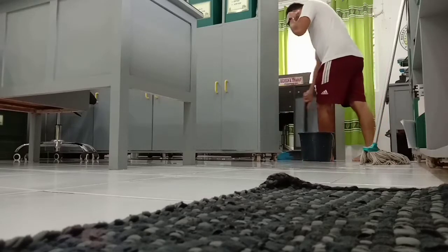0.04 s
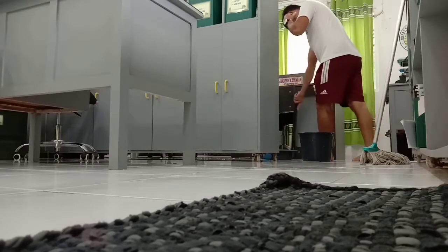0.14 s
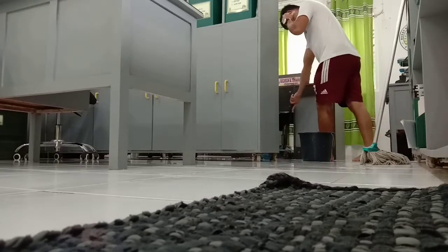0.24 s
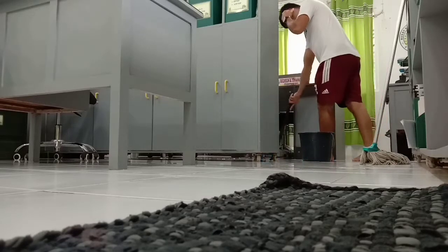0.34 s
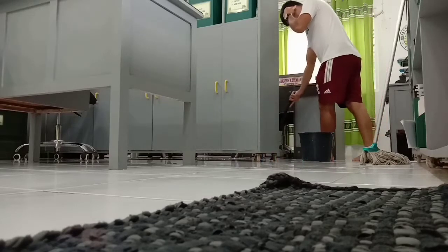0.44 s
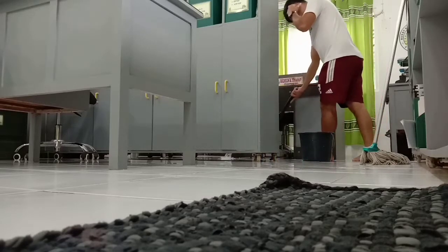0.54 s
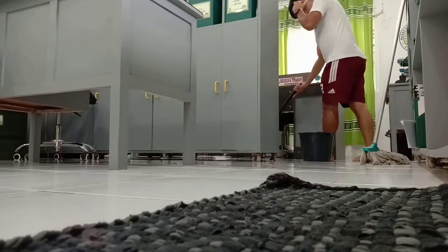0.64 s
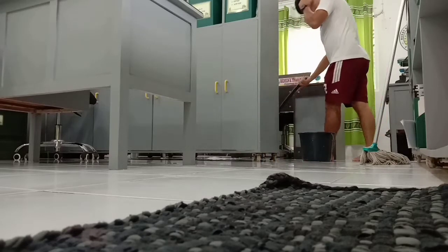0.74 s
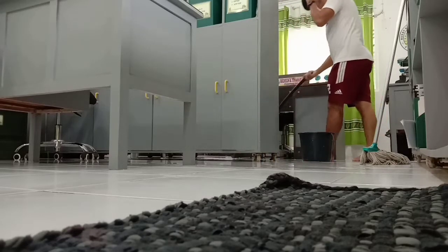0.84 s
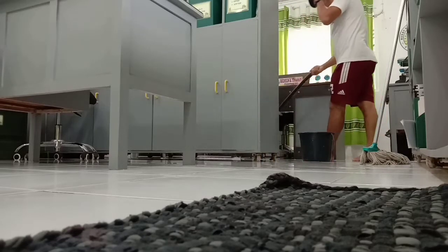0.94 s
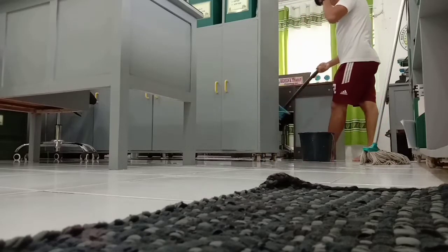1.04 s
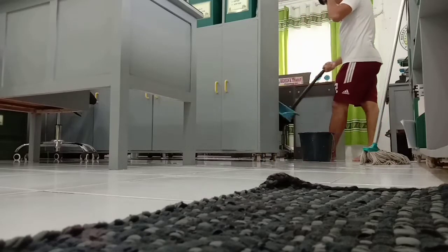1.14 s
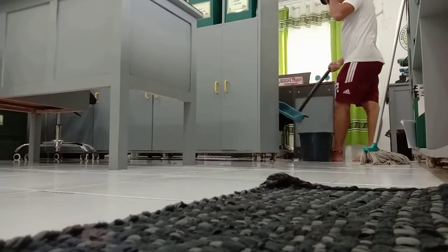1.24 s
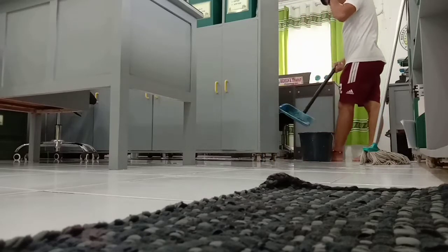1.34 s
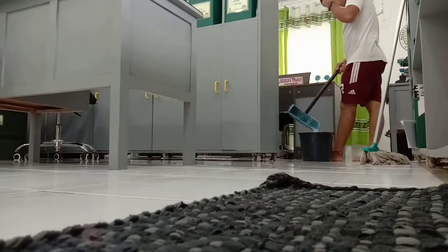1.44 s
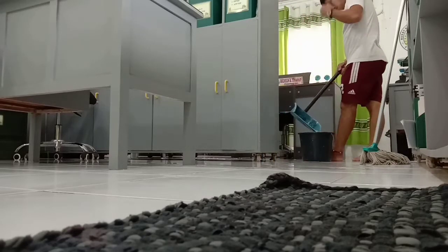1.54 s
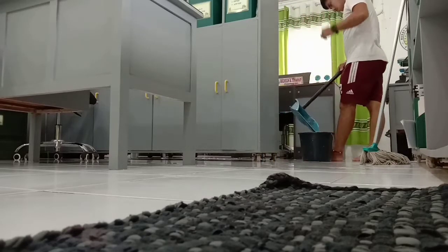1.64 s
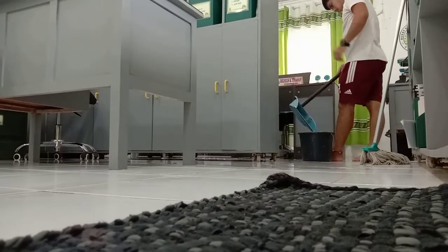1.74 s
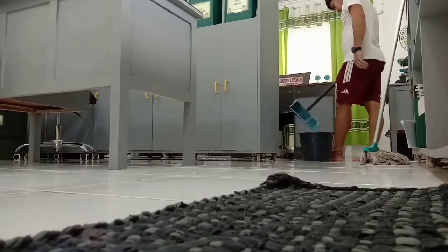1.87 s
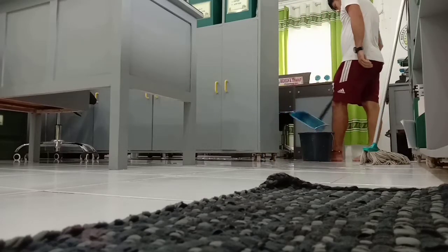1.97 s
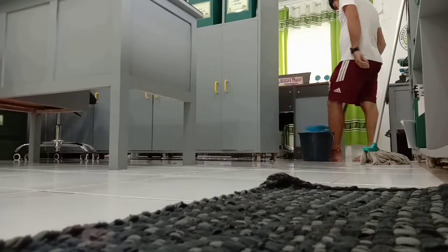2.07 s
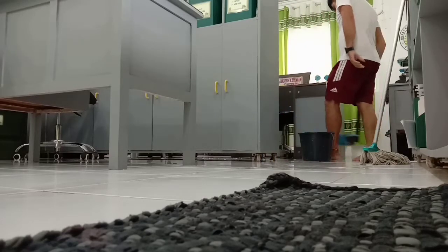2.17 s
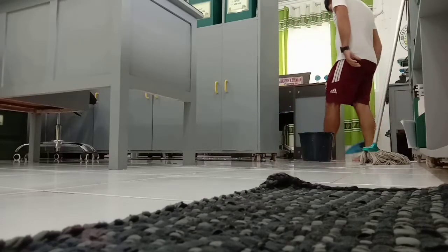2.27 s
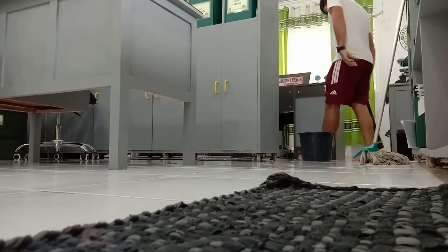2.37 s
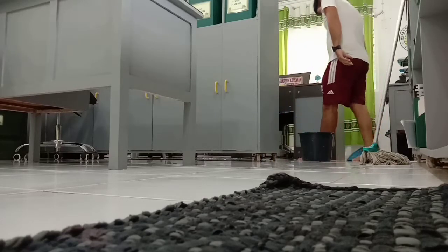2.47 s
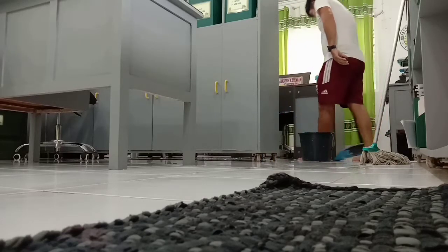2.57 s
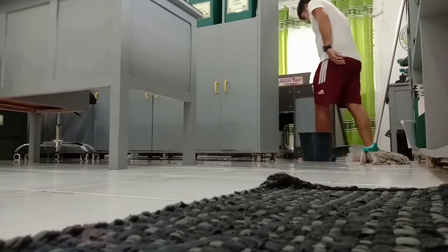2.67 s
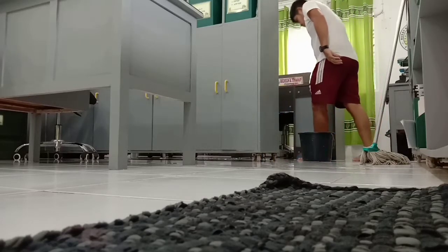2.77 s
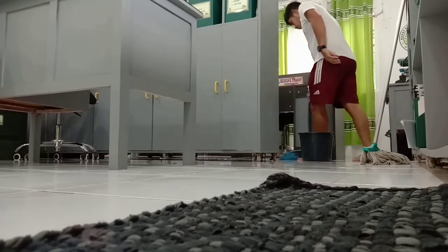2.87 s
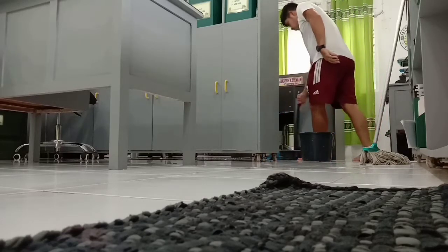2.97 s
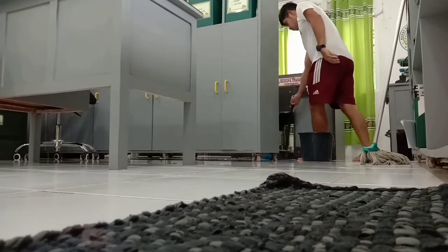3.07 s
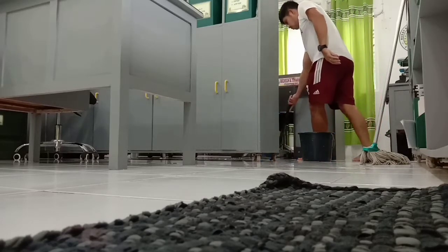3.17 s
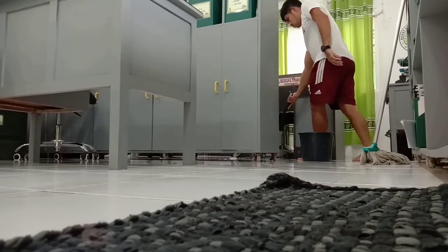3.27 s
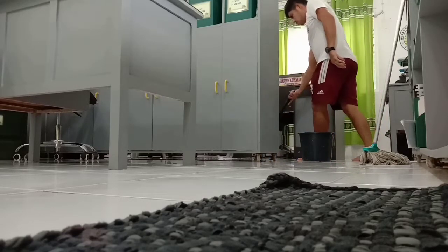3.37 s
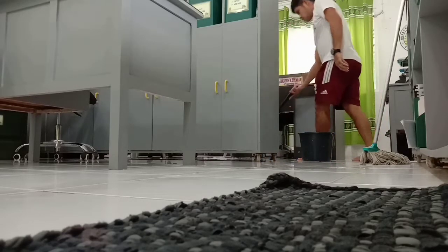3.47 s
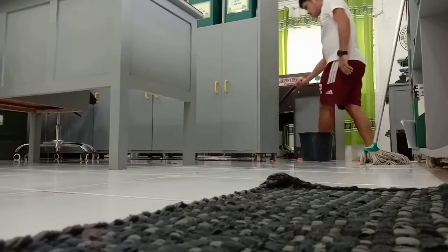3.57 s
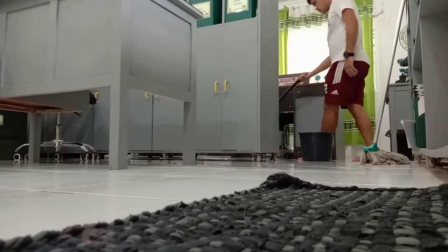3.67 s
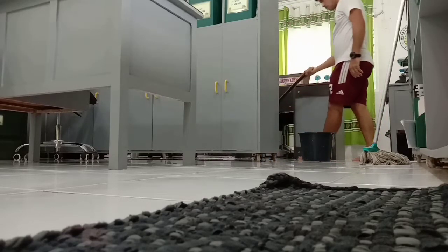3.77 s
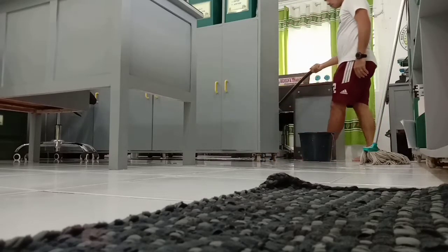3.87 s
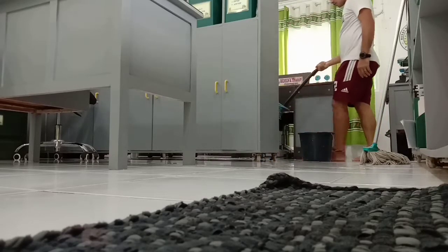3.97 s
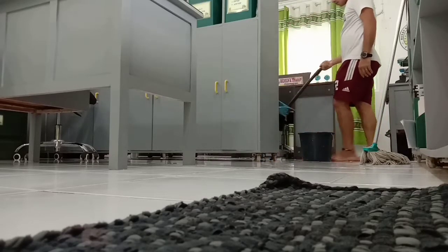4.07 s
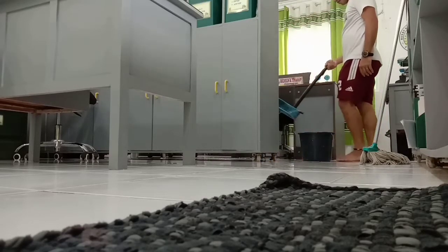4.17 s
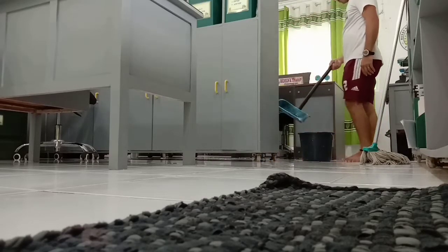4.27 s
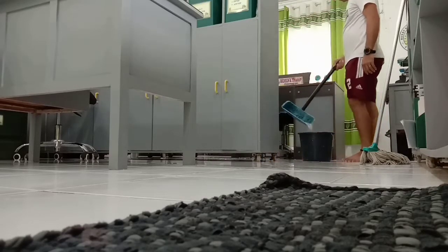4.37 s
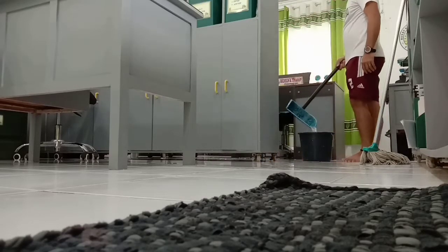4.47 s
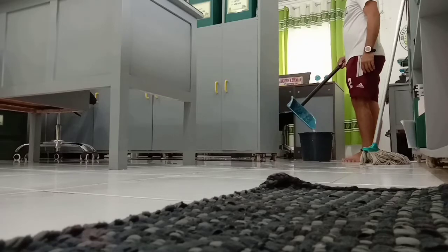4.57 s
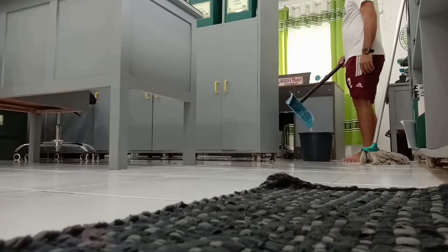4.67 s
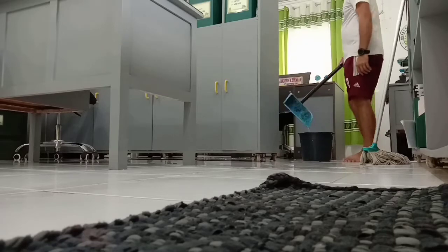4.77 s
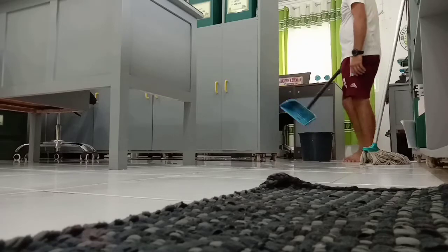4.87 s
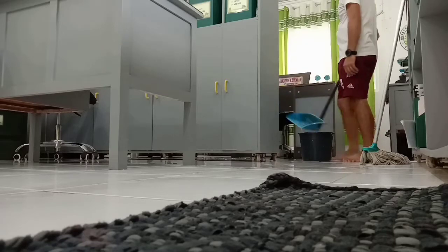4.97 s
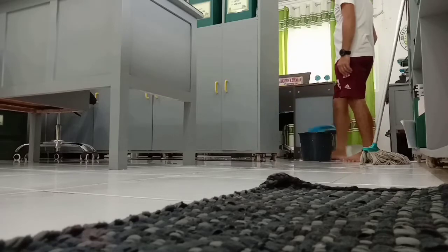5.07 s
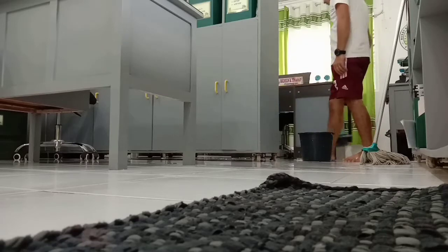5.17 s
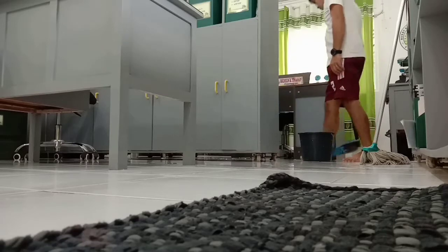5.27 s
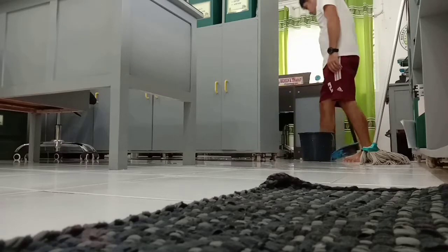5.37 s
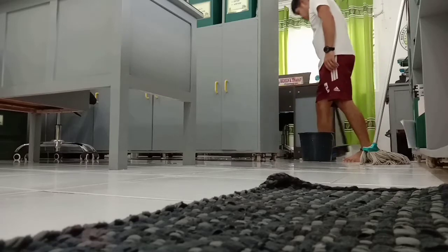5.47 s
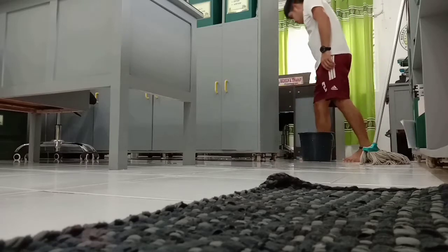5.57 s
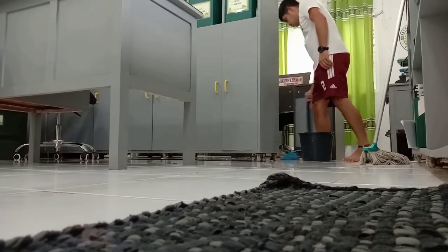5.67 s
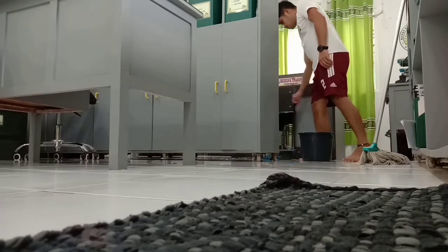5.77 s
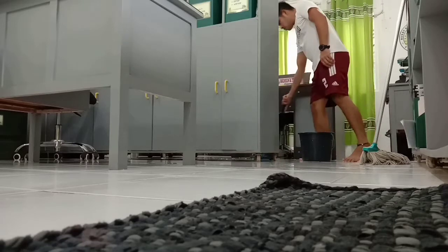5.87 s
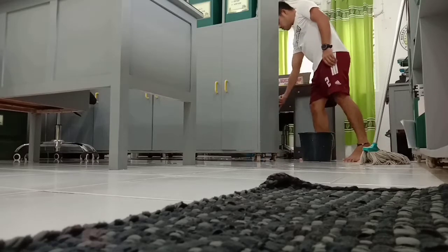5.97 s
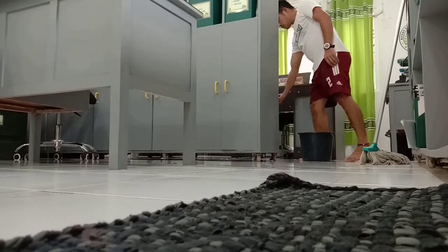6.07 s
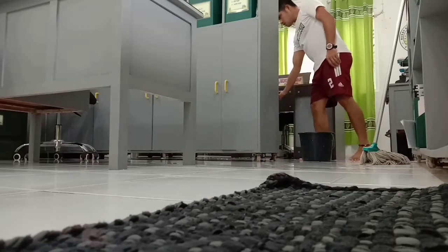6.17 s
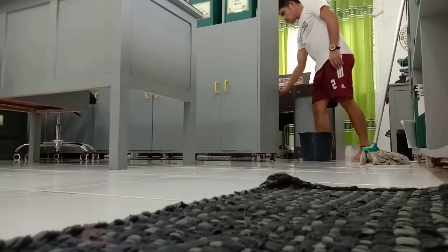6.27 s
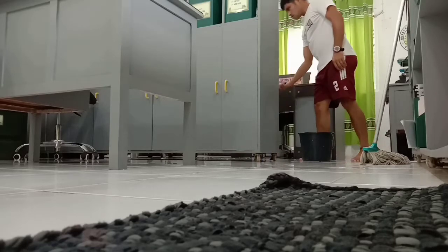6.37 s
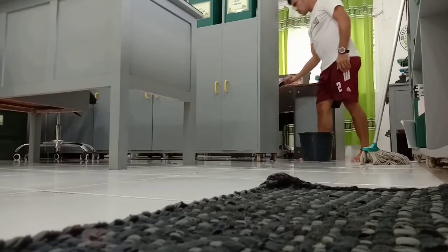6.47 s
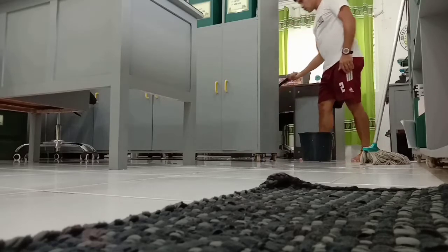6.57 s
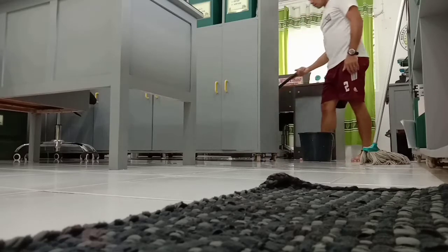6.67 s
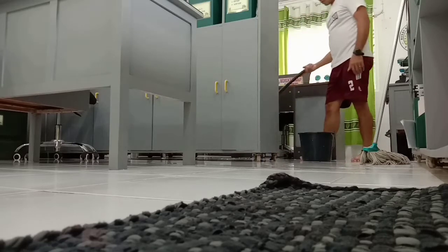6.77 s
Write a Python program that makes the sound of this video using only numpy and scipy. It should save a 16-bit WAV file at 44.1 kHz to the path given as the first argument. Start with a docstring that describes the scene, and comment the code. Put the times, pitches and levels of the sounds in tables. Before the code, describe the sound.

A plastic dustpan knocks and scrapes on a wet tile floor, then water dribbles and is tipped into a bucket, twice, indoors.

```python
"""A plastic dustpan clatters onto a wet tile floor and scrapes through the water. Blows ring its tray,
walls and edge; its lip sticks and slips. Lifted, it dribbles and is tipped into a bucket: showers of
small bubbles, single drops, a few glugs. This happens twice, and a third scoop begins. All is heard from
a few metres off, mostly through the ring of a small hard room, over steady air noise and a faint hum."""
import sys
import numpy as np
from scipy import signal
from scipy.fft import rfft, irfft
from scipy.io import wavfile

SR = 44100
rng = np.random.default_rng(int(sys.argv[2]) if len(sys.argv) > 2 else 0)


def log_audio(samples):
    """Write samples as a 16-bit WAV file to the path given in sys.argv[1]."""
    # one column per channel
    frames = np.atleast_2d(samples).T
    # limit to full scale, then quantise
    limited = np.clip(frames, -1, 1)
    pcm = np.round(limited * 32767).astype(np.int16)
    wavfile.write(sys.argv[1], SR, pcm)


N = 300762
T = np.arange(N) / SR

# pan modes, flexing tray to stiff front edge: f/Hz, width/Hz, level/dB
TRAY_MODES = [(229, 43, -9), (317, 24.7, -3.5), (391, 33.5, -2.5), (515, 67, -6.5)]
WALL_MODES = [(613, 66, -6.5), (732, 98, -0.5), (886, 233, 0), (1039, 150, -1.5)]
EDGE_MODES = [(1108, 58, 0.58), (1264, 186, -4.1)]
# wet crack spectrum: f/Hz, level/dB
CRACK_EQ = [(150, -41), (500, -63), (1400, 4.5), (2000, 4), (2700, 3), (3500, -2.5), (5500, -3),
            (8000, -5.5), (11000, -12), (15000, -26)]
# pan knocks, except the row at 0.41 s: a faint, brief swell of the background ring near 1250 Hz
# t/s, level/dB, tray/dB, edge/dB, crack/dB (these three re walls), contact/s
RING_EVENTS = [(0.001, -34.5, -7.5, 0, -0.5, 0.0045), (0.020, -32, -5.5, -16, -3, 0.017),
               (0.068, -33, -6, -2.5, -14, 0.0076), (0.154, -35.5, -7, -8, -4.5, 0.0037),
               (0.181, -38, -25, -5.5, -10, 0.0035), (.41, -60, -17, 7.5, -9, .006),
               (2.401, -27, -4, -14, -5.5, 0.0063), (2.422, -29.5, -2.5, -8, -5.5, 0.008),
               (2.626, -22, -3.5, -10.5, -6.5, 0.017), (2.656, -26.5, -7, -5, -10, 0.016),
               (2.803, -34.5, -7.5, 1.5, -8, 0.0091), (2.871, -27.5, -8.5, 1, -6.5, 0.0059),
               (2.908, -26, -9.5, -14, -8.5, 0.006), (3.012, -25.5, -11, -14, -7.5, 0.0088),
               (3.046, -30.5, -9, -5.5, -12, 0.0084), (3.114, -41, -10, -9, -9, 0.0036),
               (5.384, -25.5, -4, -12, -8, 0.0109), (5.643, -46, -10, 13, 8, 0.0077),
               (5.690, -21.5, -14, 3.5, -0.5, 0.0013), (5.709, -28, -6.5, 5.5, -4, 0.0083),
               (5.73, -24, -35, -2, -9, 0.0071), (5.799, -37, -17, 5, -12, 0.0036)]
def knocks(size=24000, cushion=0.1):
    """A blow is a chatter of contacts that rings tray, walls and edge, with a wet crack on top."""
    out, t = np.zeros(N), T[:size]
    bass_cut = signal.butter(4, 250, "high", fs=SR, output="sos")  # a small pan radiates little bass
    for s, db, tray_db, edge_db, crack_db, contact_s in RING_EVENTS:
        contact_s = max(contact_s, 0.003)
        touch_s = cushion * contact_s  # the water film softens the first touch
        chatter = rng.standard_normal(size) * np.exp(-t / contact_s) * (1 - np.exp(-t / touch_s))
        drive = signal.sosfilt(bass_cut, through(chatter, room(HIDDEN_DB)))
        parts = [(ring(drive, TRAY_MODES), tray_db), (ring(drive, WALL_MODES), 0),
                 (ring(drive, EDGE_MODES), edge_db), (colour(drive, CRACK_EQ), crack_db)]
        add(out, s - touch_s, sum(undb(db + part_db) * unit(part, size=2600) for part, part_db in parts))
    return out


# thud modes: f/Hz, width/Hz, level/dB
THUD_MODES = [(76, 23, -10), (110, 24, -6.5), (196, 30, -7)]
# dull thumps into the floor, each with its own low cut: t/s, level/dB, low cut/Hz
FLOOR_THUMPS = [(0.151, -53, 70), (2.408, -47, 100), (2.63, -36.5, 70.4), (2.682, -46, 70),
                (2.899, -44, 80), (5.723, -45, 280)]
def thumps(fade_s=0.0031, size=16000):
    """The weight of a full stroke thumps dully into the floor."""
    out = np.zeros(N)
    for s, db, low_cut_hz in FLOOR_THUMPS:
        push = through(rng.standard_normal(size) * np.exp(-T[:size] / fade_s), room(HIDDEN_DB))
        push = signal.sosfilt(signal.butter(2, low_cut_hz, "high", fs=SR, output="sos"), push)
        add(out, s, undb(db) * unit(ring(push, THUD_MODES), size=3000))
    return out


# strokes over wet tile: t/s, length/s, level/dB, slope/(dB/s)
LIP_STROKES = [(0, 0.15, -37, 37), (.14, 0.17, -36.5, -50), (2.455, 0.2, -36.5, 11),
               (2.592, 0.5, -25.5, -11.5), (5.388, 0.273, -32.5, 17), (5.719, 0.21, -27.5, -67)]
def pressure(attack_s=0.0077, release_s=0.018):
    """In each stroke the lip bites, is leaned on more or less, and lets go."""
    total = 0
    for s, length_s, db, db_per_s in LIP_STROKES:
        age = T - s
        bite = np.clip(age / attack_s, 0, 1)
        release = np.exp(-np.maximum(age - length_s, 0) / release_s)
        total = total + bite * release * undb(db + db_per_s * np.clip(age, 0, length_s))
    return total


# friction spectrum: f/Hz, level/dB
GRIT_EQ = [(80, -24), (200, -42), (380, -8), (500, -23.5), (720, 6.5), (1200, 1.5), (2200, 3), (3500, -3),
           (6000, -5.5), (9000, -11.5), (15000, -30)]
def scrape(slips_per_s=1500, rough_db=6, rub_db=-4, edge_db=-7.5, tray_db=-12):
    """The lip sticks and slips over the tile in dense uneven ticks that ring edge and tray."""
    slipping = rng.random(N) < slips_per_s / SR
    slips = slipping * rng.standard_normal(N) * undb(rough_db * rng.standard_normal(N))
    grit = unit(colour(slips, GRIT_EQ))
    edge = undb(edge_db) * unit(ring(slips, EDGE_MODES))
    tray = undb(tray_db) * unit(ring(slips, TRAY_MODES))
    return (grit + edge + tray) * pressure() * undb(rub_db)


# water slopping onto the tiles: peak t/s, half length/s, spatter/dB, spray/dB
TILE_SPILLS = [(0.598, 0.031, -41, -44), (.75, 0.089, -40.5, -50), (0.869, 0.017, -41, -35),
               (1.073, 0.027, -53, -55), (1.313, 0.026, -49, -58), (3.434, 0.099, -50, -55),
               (3.596, 0.064, -42.5, -48), (4.327, 0.0086, -46, -54), (4.415, 0.098, -45.5, -58)]
# pan tipped into the bucket: peak t/s, rise/s, stream/dB, spray/dB
BUCKET_POURS = [(1.635, 0.057, -42, -60), (4.586, 0.096, -39.5, -33)]
def flows(full_spill_db=-40.5, churn_db=-50.5, drain_db_per_s=60.5):
    """Envelopes of spatter, fine spray and churning stream as water leaves the pan."""
    spatter, spray, stream = np.zeros((3, N))
    for s, half_s, db, spray_db in TILE_SPILLS:
        slop = swell(s, half_s)
        spatter += undb(db) * slop
        spray += undb(spray_db) * slop
        stream += undb(churn_db) * (undb(db - full_spill_db) * slop) ** 5.7  # thin spills hardly churn
    for s, rise_s, db, spray_db in BUCKET_POURS:
        pour = gush(s, rise_s, drain_db_per_s)
        stream += undb(db) * pour
        spatter += undb(db + 1) * pour ** 0.99
        spray += undb(spray_db) * pour ** 2.5  # spray needs the stream's full force
    return spatter, spray, stream


# spatter and stream spectra: f/Hz, level/dB
SPATTER_EQ = [(1200, -13), (2400, -13), (3400, -9.5), (5000, -8.5), (7500, -2.5), (10000, -6), (15000, -8)]
STREAM_EQ = [(120, 11), (400, -7.5), (650, -2), (1100, 3), (1600, 3), (2400, 4.5), (3500, 1.5),
             (6000, -0.5), (12000, -48)]
def water(spatter_db=2, stream_db=7):
    """Fine spatter crackles and fizzes; the thicker stream churns up lower bubbles."""
    spatter_flow, spray_flow, stream_flow = flows()
    crackle = shower(1800, 15000, cycles=1.2, spread_db=5.5, count=3500, size=128)
    fizz = shower(2800, 9500, cycles=5, spread_db=4.5, count=2200, size=600)
    spatter = undb(spatter_db) * unit(colour(crackle + fizz, SPATTER_EQ)) * spatter_flow
    spray = shower(8000, 14500, cycles=3, spread_db=4.5, count=4000, size=96) * spray_flow
    churn = shower(450, 4500, cycles=5, spread_db=3, count=3500, size=1200)
    slaps = shower(300, 6000, cycles=1.1, spread_db=3, count=4000, size=400)
    stream = undb(stream_db) * unit(colour(churn + slaps, STREAM_EQ)) * stream_flow
    return sum(through(layer, room(IN_SIGHT_DB)) for layer in (spatter, spray, stream))


# squirts at the hardest blows: t/s, level/dB
LIP_SQUIRTS = [(2.636, -30.5), (5.694, -21)]
def squirts(gain_db=2, rise_s=0.0036, fall_db_per_s=383):
    """A flat blow shoots water from under the lip: a short, dense burst of tiny drops."""
    burst = sum(undb(db) * gush(s, rise_s, fall_db_per_s) for s, db in LIP_SQUIRTS)
    droplets = shower(3000, 15000, cycles=1.1, spread_db=2, count=14000, size=96)
    return undb(gain_db) * through(unit(colour(droplets, SPATTER_EQ)) * burst, room(HIDDEN_DB))


# single drops: t/s, level/dB, f/Hz
DRIPS = [(0.024, -38, 6600), (0.601, -49, 5600), (.724, -38.5, 6180), (0.769, -46, 6600), (.915, -39, 6130),
         (1.30, -63, 4200), (1.453, -43, 5950), (1.458, -34.5, 7450), (1.55, -43.5, 6500),
         (1.712, -35.5, 5600), (1.778, -49, 7500), (1.878, -37, 5650), (1.975, -42, 11900),
         (1.977, -48, 8240), (2.913, -33.5, 6300), (3.02, -45, 6340), (3.519, -47, 4700),
         (3.605, -48, 6200), (4.357, -40, 9150), (4.477, -36, 4480), (4.543, -33.5, 6860),
         (4.623, -42, 6160), (4.741, -43, 6900), (4.804, -44, 5600), (5.696, -35, 6850)]
def drops(tick_gain=2, size=14000):
    """A drop ticks on impact, then breaks into four tiny bubbles of unlike size."""
    out, t = np.zeros(N), T[:size]
    for s, db, hz in DRIPS:
        splash = tick_gain * bubble(t, hz, cycles=0.67, glide=0)
        for late_s, octaves in rng.uniform([0, -0.22], [0.005, 0.22], (4, 2)):
            splash += bubble(np.maximum(t - late_s, 0), hz * 2 ** octaves, cycles=5, glide=0.08) / 2
        add(out, s, undb(db) * unit(through(splash, room(direct_db=-8)), size=1000))
    return out


# large bubbles in the bucket and the swaying pan: t/s, level/dB, f/Hz
LARGE_BUBBLES = [(1.49, -47.5, 399), (1.515, -46, 617), (1.75, -39, 657), (1.837, -36, 722),
                 (1.872, -64, 740), (1.935, -47, 2440), (3.875, -48.5, 820), (4.47, -54, 397),
                 (4.74, -44.5, 910), (4.765, -42.5, 763), (4.81, -45, 684), (4.865, -44.5, 910),
                 (4.875, -43.5, 576), (4.94, -50, 560), (6.255, -48, 820)]
def glugs(gulp_db=-2, size=16000):
    """A cavity closes with a short gulp and leaves a large bubble ringing."""
    out, t = np.zeros(N), T[:size]
    for s, db, hz in LARGE_BUBBLES:
        gulp = undb(gulp_db) * bubble(t, hz, cycles=0.86, glide=0.25)
        glug = gulp + bubble(t, hz, cycles=6, glide=0.05)
        add(out, s, undb(db) * unit(through(glug, room(IN_SIGHT_DB)), size=1500))
    return out


def lapping(level_db=-59):
    """The disturbed puddle laps faintly throughout."""
    laps = shower(170, 950, cycles=4, spread_db=2, count=70, size=5000)
    return undb(level_db) * through(laps, room(IN_SIGHT_DB))


def squeak(peak_s=6.64, half_s=0.07, hz=5700, width_hz=180, level_db=-60):
    """A thin, unsteady whistle as the last scoop is lifted."""
    whistle = unit(ring(rng.standard_normal(N), [(hz, width_hz, 0)]))
    return undb(level_db) * whistle * swell(peak_s, half_s)


# fan-like noise spectrum: f/Hz, level/dB
AIR_EQ = [(30, -6), (70, 3.5), (240, 5.5), (400, 5), (560, -1.5), (690, -1), (820, 4.5), (950, 3),
          (1250, 4.5), (1700, -6.5), (3000, -10), (7000, -12), (10000, -10), (15000, -15.5)]
# room resonances: f/Hz, width/Hz, level/dB
ROOM_MODES = [(114, 14, -24), (228.4, 18, -0.5), (549, 32, 6), (820, 8.8, 4), (1245.6, 19, 3.5),
              (4300, 190, -1), (6190, 180, 1.5)]
def background(air_db=-50, hum_db=-64, hum_hz=118):
    """Steady air noise, noise-driven room resonances that swell and fade, and a faint mains hum."""
    air = unit(colour(rng.standard_normal(N), AIR_EQ))
    murmur = 0
    for hz, width_hz, db in ROOM_MODES:
        waver = unit(signal.resample(rng.standard_normal(80), N))
        resonance = unit(ring(rng.standard_normal(N), [(hz, width_hz, 0)]))
        murmur = murmur + undb(db) * resonance * (1 + np.tanh(waver) / 2)
    hum = unit(np.sin(2 * np.pi * hum_hz * T))
    return undb(air_db) * (air + unit(murmur) / 2) + undb(hum_db) * hum


HIDDEN_DB, IN_SIGHT_DB = -6.5, -5.5  # direct sound re tail: pan behind a cabinet, water beside it
# reverberation time: f/Hz, T60/s
ROOM_DECAY = [(100, 0.31), (500, 0.39), (2000, 0.37), (6000, 0.46), (12000, 0.4)]
def room(direct_db, echo_db=-15, size=22050):
    """Direct sound, sparse cabinet echoes and a diffuse tail; each call is another spot on the floor."""
    t, tail = T[:size], 0
    spectrum, t60_s = rfft(rng.standard_normal(size)), on_log_axis(ROOM_DECAY, size)
    octave = np.round(np.log2(np.arange(len(spectrum)) + 128))
    for band in np.unique(octave):
        in_band = octave == band
        tail = tail + irfft(spectrum * in_band) * np.exp(-np.log(1000) * t / t60_s[in_band].mean())
    response = unit(tail) / np.sqrt(size) * np.minimum(t / 0.0007, 1)
    echo_samples = (rng.uniform(0.004, 0.045, 10) * SR).astype(int)
    response[echo_samples] += undb(echo_db) * rng.choice([-1, 1], 10)
    response[0] += undb(direct_db)
    return response / np.linalg.norm(response)


def bubble(t, hz, cycles, glide):
    """A trapped bubble swings up within a cycle and rings down while its pitch climbs."""
    age = t * hz / cycles
    envelope = (1 - np.exp(-2 * t * hz)) * np.exp(-age)
    return envelope * np.sin(2 * np.pi * hz * t * (1 + glide * age / (2 + age)))


def shower(low_hz, high_hz, cycles, spread_db, count, size):
    """Bubbles scattered over the whole scene, mostly faint, a few loud."""
    when, pitch, life = rng.random((count, 3)).T[:, :, None]
    gain = undb(spread_db * np.minimum(rng.exponential(size=(count, 1)), 4))
    hz = low_hz * (high_hz / low_hz) ** pitch
    waves = gain * np.sqrt(hz) * bubble(T[:size], hz, cycles * (1.17 + life), glide=0.16)
    places = (when * N).astype(int) + np.arange(size)
    return unit(np.bincount(places.ravel(), waves.ravel(), N)[:N])


def swell(s, half_s):
    """A smooth rise and fall around time s."""
    return np.exp(-((T - s) / half_s) ** 2)


def gush(s, rise_s, fall_db_per_s):
    """A flow that builds until time s, then drains away."""
    return np.where(T < s, swell(s, rise_s), undb(-fall_db_per_s * np.maximum(T - s, 0)))


def ring(x, modes, size=4096):
    """Drive damped modes of alternating sign."""
    t, response = T[:size], 0
    for k, (hz, width_hz, db) in enumerate(modes):
        envelope = undb(db) * width_hz * np.exp(-np.pi * width_hz * t)
        response = response + (-1) ** k * envelope * np.sin(2 * np.pi * hz * t)
    return through(x, response)


def colour(x, points, size=4096):
    """Minimum-phase filter through (f/Hz, level/dB) points."""
    cepstrum = irfft(np.log(undb(on_log_axis(points, size))))
    cepstrum[1:size // 2] *= 2
    cepstrum[size // 2 + 1:] = 0
    return through(x, irfft(np.exp(rfft(cepstrum))))


def on_log_axis(points, size):
    """Interpolate (f/Hz, value) points at the FFT bins."""
    hz, value = np.transpose(points)
    return np.interp(np.log(np.fft.rfftfreq(size, 1 / SR) + 1), np.log(hz), value)


def through(x, response):
    """Convolve, keeping the length."""
    return signal.fftconvolve(x, response)[:len(x)]


def add(out, s, x):
    """Mix x in at time s."""
    start = max(int(s * SR), 0)
    out[start:start + len(x)] += x[:N - start]


def undb(db):
    """Decibels to gain."""
    return 10 ** (np.asarray(db) / 20)


def unit(x, size=None):
    """Scale to rms 1 over the first size samples."""
    return x / np.sqrt(np.mean(x[:size] ** 2) + 1e-20)


def scene():
    """The pan knocks and scrapes, water runs off it, and the room murmurs on."""
    pan = knocks() + thumps() + through(scrape(), room(HIDDEN_DB))
    return (pan + squirts() + water() + drops() + glugs() + lapping() + squeak() + background())[None]


# microphone port resonances: f/Hz, level/dB
MIC_EQ = [(25, 0), (42, -12), (70, 3.5), (120, -1), (1020, 1), (1130, 3.5), (1260, 7.5), (1400, 1),
          (1600, -2), (4200, -3.5), (6300, -3), (6520, -10), (6950, -2.5), (7600, -6), (8500, -15.5),
          (13000, -23), (14900, -10), (16000, -16)]
def record(dry, top_hz=15550):
    """A phone's microphone colours the sound and cuts the top."""
    top_cut = signal.ellip(10, 0.2, 80, top_hz, fs=SR, output="sos")
    return signal.sosfilt(top_cut, colour(dry[0], MIC_EQ))[None]


dry = scene()
out = record(dry)
log_audio(out)
```